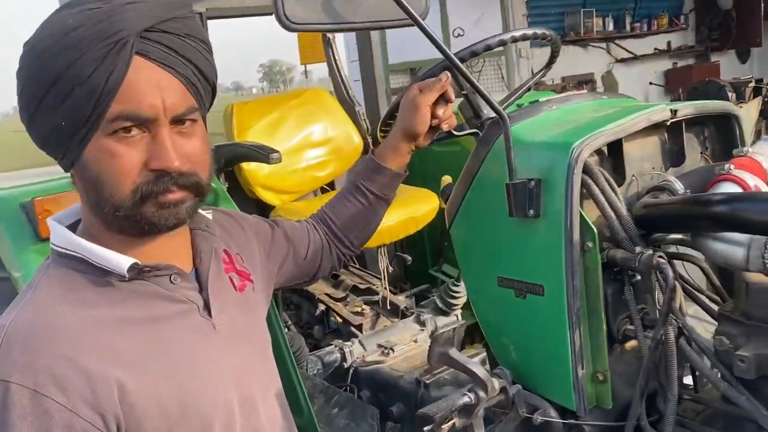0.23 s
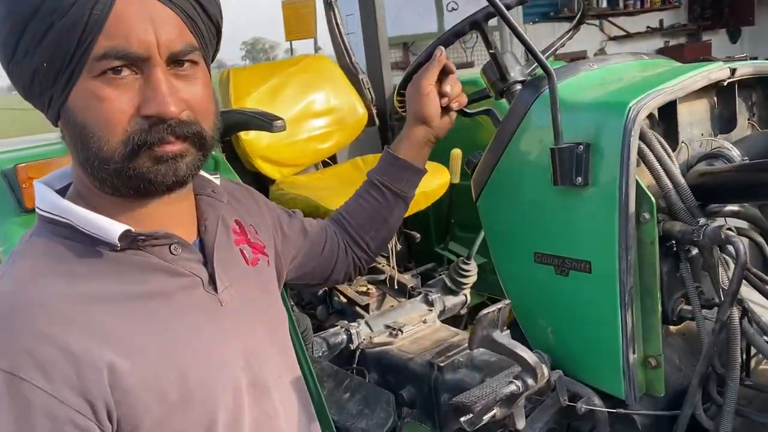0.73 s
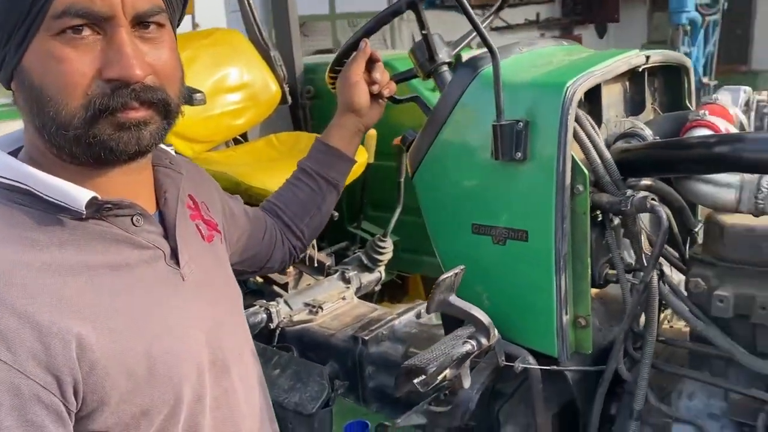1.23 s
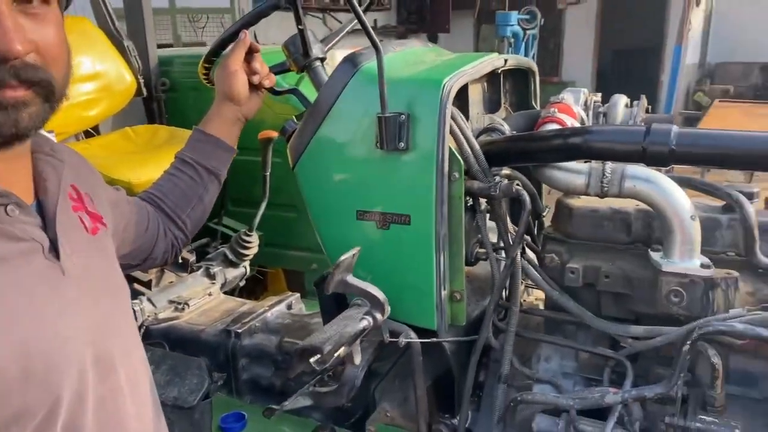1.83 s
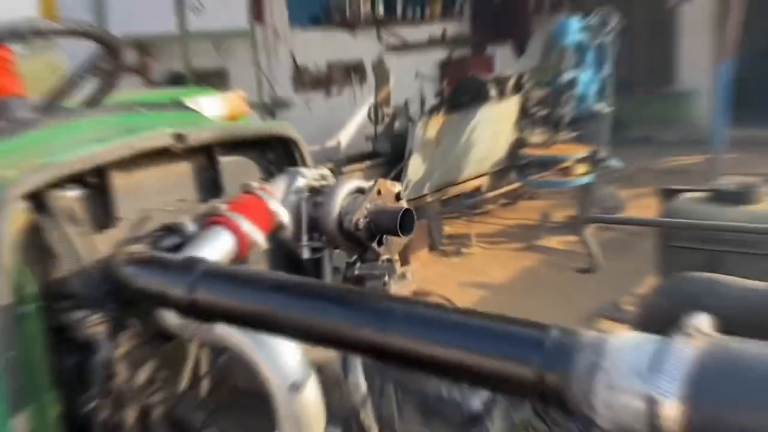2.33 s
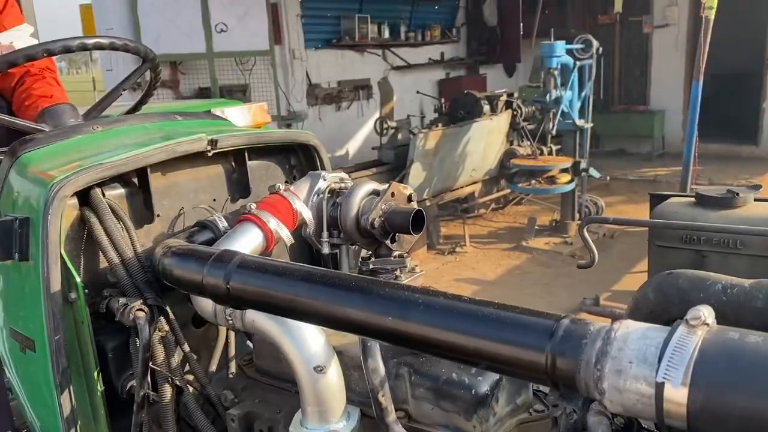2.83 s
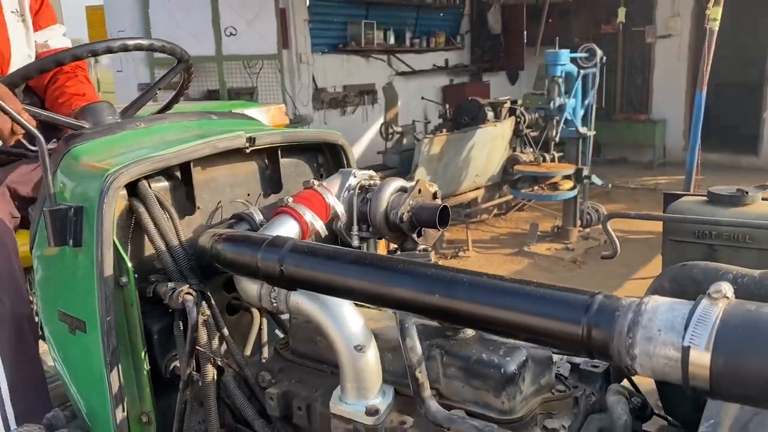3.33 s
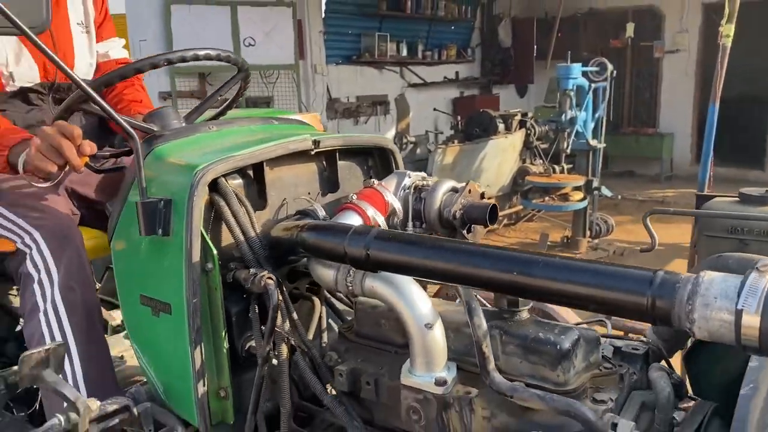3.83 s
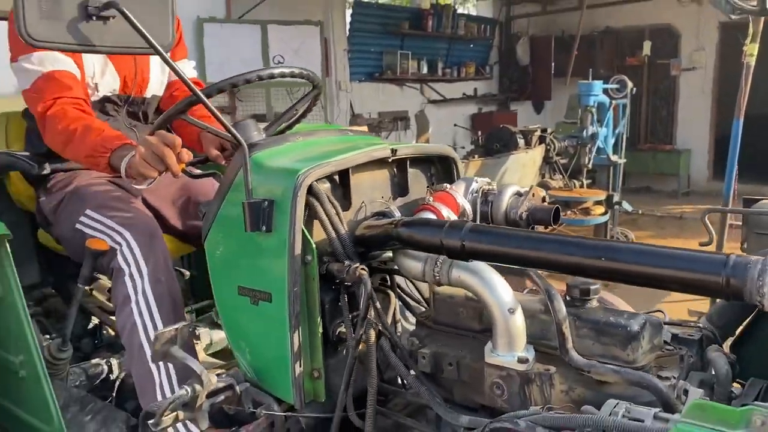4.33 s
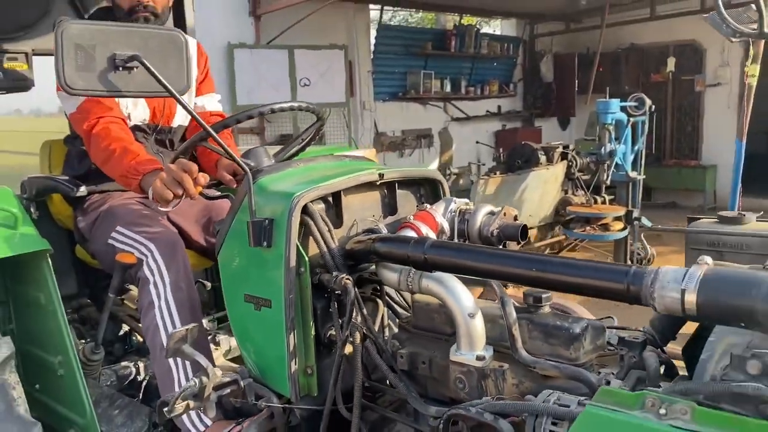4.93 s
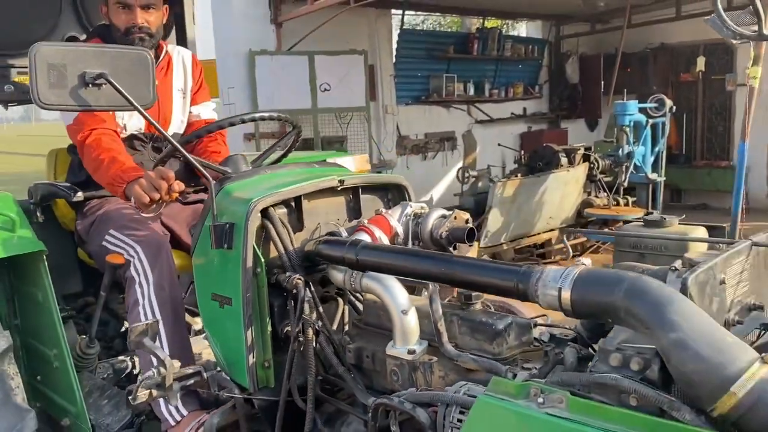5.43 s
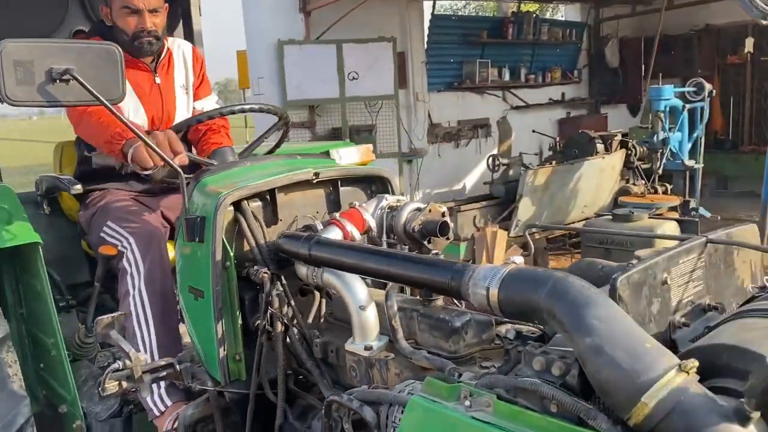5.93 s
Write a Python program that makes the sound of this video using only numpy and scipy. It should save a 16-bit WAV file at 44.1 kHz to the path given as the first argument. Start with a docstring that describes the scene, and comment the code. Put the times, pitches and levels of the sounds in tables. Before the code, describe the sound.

Close up in an open workshop yard, a three-cylinder turbo diesel tractor pulls hard at once with rapid knocking and a rising turbo whistle. The throttle shuts after about half a second and it coasts down, fading out. A second pull fades in, higher and fiercer, then shuts with a fluttering hollow moan, sinks to a slow knocking idle, and is revved again at the very end.

```python
"""A three-cylinder turbo diesel tractor is revved close by in an open workshop yard, in two parts.
Part one pulls hard at once, is shut off after 0.6 s and coasts into a fade-out. Part two fades in pulling,
shuts at 3.3 s, moans as the boost bleeds off, slows to idle and pulls again from 5.7 s.
Each firing knocks the block (shaped noise), spits air and thumps the open pipe (filtered clicks);
the turbine whistles (a gliding sine), lagging behind the throttle."""
import sys
import numpy as np
from scipy import signal
from scipy.io import wavfile
from scipy.ndimage import uniform_filter1d

SR = 44100
rng = np.random.default_rng(int(sys.argv[2]) if len(sys.argv) > 2 else 0)


def unload_audio(sound):
    """Save the sound as a 16-bit wav file, at the path given as the first command line argument."""
    columns = np.transpose(np.atleast_2d(sound))
    # keep every value between -1 and 1, then stretch to whole-number steps
    steps = np.round(np.clip(columns, -1, 1) * 32767)
    wavfile.write(sys.argv[1], SR, steps.astype(np.int16))


N = 272538

# Engine speed, one table a part: (time [s], firing rate [1/s])
FIRING_RATE = [
    [(0.0, 29.75), (0.2, 34.32), (0.4, 39.99), (0.55, 42.85), (0.7, 43.86), (0.9, 42.81), (1.2, 40.57),
     (1.5, 37.29), (1.8, 35.05), (2.2, 31.88)],
    [(2.2, 43.85), (2.45, 49.83), (2.7, 56.57), (2.95, 62.19), (3.15, 56.4), (3.35, 52.57), (3.5, 47.4),
     (3.7, 37.78), (3.9, 28.34), (4.1, 22.66), (4.35, 23.02), (4.6, 19.03), (4.9, 18.78), (5.3, 19.36),
     (5.7, 19.57), (5.8, 22.47), (6.0, 27.14), (6.18, 32.32)],
]
# Share of a firing cycle gone when each part opens: (part one [cycle], part two [cycle])
FIRST_TURN = [.26, .22]
# Throttle, one table a part:
# (time [s], fuel [0-1], hard-working tone in the pipe [0-1], hard-working tone in the block [0-1])
THROTTLE = [
    [(0, 0.96, 0.98, 0.8), (.4, 0.98, 1, 0.7), (.64, 0.55, 0.9, 0.36), (.74, 0.12, 0.03, 0.02),
     (2.2, 0.08, 0.06, 0.01)],
    [(2.2, 1, 0.95, 0.97), (2.8, 0.91, 1, 0.98), (3.0, 0.51, 1, 1), (3.2, 0.95, 1, 0.99),
     (3.33, 0.8, 0.92, 0.68), (3.4, 0.53, 0.4, 0.5), (3.6, 0.08, 0, 0.43), (3.9, 0.02, 0.1, 0.41),
     (4.2, 0.1, 0.2, 0.18), (4.5, 0.05, 0.1, 0.4), (4.8, 0.19, 0, 0.67), (5.735, 0.26, 0, 0.7),
     (5.75, 0.97, 0.95, 0.67), (6.18, 1, 0.97, 0.62)],
]
# Treble, one table a part: (time [s], air spit level [dB], treble level above the whistle [dB])
TREBLE = [
    [(0, -24, 0), (.3, -24.5, 6), (.62, -33.5, -6), (.76, -30, 0), (1.1, -27.5, -27), (1.75, -31.5, -37),
     (2.2, -29.5, 0)],
    [(2.2, -25.5, 5), (2.6, -27, 2), (3.3, -39, 2.5), (3.5, -37, 4), (3.7, -30.5, 2), (3.95, -31, 5),
     (4.15, -36.5, -39), (4.35, -35, -17), (4.5, -39, -2), (4.68, -45, -18), (4.8, -57, -2),
     (4.95, -49, -3.5), (5.72, -65, -0.5), (5.75, -34.5, 0), (6.18, -29.5, -5.5)],
]
IDLE_S, SETTLE_S = 4.5, 0.28  # the idle takes hold in part two


def tractor(part, t):
    """One part of the engine: every layer is paced by the same firing count."""
    idle = np.clip((t - IDLE_S) / SETTLE_S, 0, 1) if part else 1
    rate, = curves(FIRING_RATE[part], t)
    spit_db, treble_db = curves(TREBLE[part], t)
    fuel, pipe_share, block_share = np.clip(curves(THROTTLE[part], t), 0, 1)
    idling = part * idle * np.clip(2 - 2 * fuel, 0, 1)
    blade_hz = turbine(part, t)
    pipe_db, knock_db, clatter_db, hiss_db = levels(part, fuel, rate, blade_hz)

    turns = FIRST_TURN[part] + np.cumsum(rate) / SR
    fired = firing_count(part, turns, fuel, rate)
    firing_db = strengths(part, t, fired)
    other_db = rng.standard_normal(400)

    pipe = exhaust_pipe(part, turns, fired, rate, other_db, pipe_share, idle)
    rough = gain_of(knock_db) * block_knock(part, fired, firing_db, idling)
    rough = rough + gain_of(spit_db) * air_spit(part, fired, firing_db, fuel, blade_hz)
    rough = rough + idling * valve_tick(turns, other_db)
    rough = rough + gain_of(clatter_db) * gear_clatter(part, turns, fuel, block_share, idle)
    rough = rough + gain_of(hiss_db) * air_hiss(part, len(t))
    rough = through_tinware(rough, np.minimum(blade_hz + 350, 13000), treble_db)
    tones = whistle(part, blade_hz, fired, firing_db, fuel) + moan(part, t, turns, rate)
    return gain_of(pipe_db) * pipe + rough + tones


# Knock advance under full fuel: (part one [cycle per firing/s], part two [cycle per firing/s])
ADVANCE = [0, .0135]
SLOW_FIRING = 22  # firings/s; no advance at this speed
COAST_LEAD = .1  # cycles earlier with the fuel cut
IDLE_LAG = .085  # cycles later with the fuel cut, per firing/s under SLOW_FIRING


def firing_count(part, turns, fuel, rate):
    """Combustion timing: advance grows with speed under fuel; slow coasting strokes come late."""
    advance = ADVANCE[part] * fuel * (rate - SLOW_FIRING)
    coast_lead = COAST_LEAD - IDLE_LAG * np.maximum(SLOW_FIRING - rate, 0)
    # a cylinder knocks almost half a cycle ahead of the count
    return turns + 0.4537 + advance + coast_lead * (1 - fuel)


# Firings under fuel, harder or softer than usual, one table a part: (time [s], strength [dB])
FIRING_STRENGTHS = [
    [(.017, -0.5), (.08, -2.5), (.112, -4), (.143, 1.5), (.173, -1), (.203, -2.5), (.23, 1), (.258, 1),
     (.286, -2.5), (.34, 2), (.366, -2), (.391, 2), (.442, -3), (.466, 1), (.489, 2), (.514, -1.5),
     (.537, 4)],
    [(5.76, 1), (5.806, 0), (5.849, 4), (5.889, 1), (6.04, 1), (6.072, 1), (6.105, 2.5), (6.142, 0.5)],
]


def strengths(part, t, fired):
    """dB of each firing: by chance, or from the table of firing strengths."""
    s, db = np.transpose(FIRING_STRENGTHS[part])
    firing_db = 1.8 * rng.standard_normal(400)
    firing_db[np.floor(np.interp(s, t, fired)).astype(int)] = db
    return firing_db


# Exhaust pipe resonance, a pulling and a coasting table for each part: (frequency [Hz], level [dB])
PIPE = [
    [[(24, -69), (40, -20), (59, 5), (105, 9.5), (150, 9.5), (200, -2.5), (277, 11.5), (367, -7.5),
     (450, -15), (580, -14), (990, -120)], [(24, -75), (40, -45), (50, -10), (64, -5), (133, -7.5),
     (162, 1), (248, -10), (450, -35), (580, -30), (990, -120)]],
    [[(24, 11), (40, -38), (58, -4.5), (115, 4), (172, -4.5), (238, -9), (450, -9), (580, -41),
     (990, -120)], [(24, -9), (40, -3), (73, 4), (181, -6), (245, -13), (450, -35), (580, -32),
     (990, -120)]],
]
# Thinner pipe tone as part two slows with the fuel cut: (frequency [Hz], level [dB])
SLOWING_PIPE = [(24, -39), (45, -8), (70, 2), (95, 0), (140, 3.5), (180, 3), (230, -12.5), (450, -23),
                (580, -40), (990, -120)]
PIPE_RUN_S = 0.00746  # a fuelled puff runs down the pipe
PIPE_ECHO_S, PIPE_ECHO = 0.0193, -0.52  # at idle each puff returns inverted from the open end


def exhaust_pipe(part, turns, fired, rate, other_db, share, idle):
    """Each firing's gas puff, a click over flow noise, excites the resonances of the open pipe."""
    per_puff = np.sqrt(40 / rate)
    pulling = evened(beats(fired - PIPE_RUN_S * rate, other_db)) * per_puff + 0.093 * noise(len(turns))
    if part:
        puffs = evened(beats(turns + .2 + .005 * rate, 2.5 * other_db)) * per_puff
        puffs = puffs + (.13 + .12 * idle) * noise(len(turns))
        puffs = puffs + PIPE_ECHO * idle * np.roll(puffs, round(PIPE_ECHO_S * SR))
    else:
        puffs = evened(beats(turns + 0.719 - 0.01214 * rate, 1.1 * other_db)) * per_puff
        puffs = dispersed(puffs + 0.15 * noise(len(turns)), 91, 41)
    return blended(pulling, puffs, PIPE[part], SLOWING_PIPE, share, idle)


def dispersed(x, hz, width_hz):
    """All-pass: a long pipe lets the tones around hz arrive late, spreading each puff."""
    r = np.exp(-np.pi * width_hz / SR)
    poles = np.array([1, -2 * r * np.cos(2 * np.pi * hz / SR), r ** 2])
    return signal.lfilter(poles[::-1], poles, x)


# Knock spectrum, one table a part: (frequency [Hz], level [dB])
KNOCK = [
    [(300, -31.5), (600, 8.5), (1100, -5.5), (1900, -7), (2600, 0), (4200, -0.5), (6300, -5), (9000, -36)],
    [(300, -27), (600, 8.5), (1100, -4), (2000, -1.5), (3300, -2.5), (5400, -3), (7000, -11), (9000, -26)],
]
# Knock rise time: (part one [s], part two [s])
KNOCK_RISE_S = [0.0034, 0.0039]
KNOCK_LAG, IDLE_KNOCK_LAG = [.04, 0], .19  # cycles the knock trails the spit: each part; more at idle


def block_knock(part, fired, firing_db, idling):
    """Combustion hits the block: a short noise burst with a weaker second hump."""
    knocks = beats(fired - KNOCK_LAG[part] - IDLE_KNOCK_LAG * idling, firing_db)
    envelope = burst(knocks, KNOCK_RISE_S[part], 0.0038, 0.0087, -16.5)
    return envelope * coloured(noise(len(fired)), KNOCK[part])


# Air noise spectrum, one table a part: (frequency [Hz], level [dB])
AIR = [
    [(6000, -8.5), (7300, 0.5), (8400, 2), (10800, 3.5), (12500, -1.5), (15800, -32)],
    [(6000, -7), (7000, -2), (9000, -0.5), (10800, 5.5), (12500, 4), (14000, -10), (15800, -13.5)],
]
JET_SHARE, JET_TOP_HZ = .76, 11800  # jet centre as a share of blade pitch, and its ceiling
JET_DRIFT_HZ = [1640, 1400]  # cutoff of the jet's random drift in each part


def air_spit(part, fired, firing_db, fuel, blade_hz):
    """Air bursts: broad noise under fuel; coasting, a narrow jet that sinks with the turbine."""
    n = len(fuel)
    broad = coloured(noise(n), AIR[part])
    carrier = np.exp(2j * np.pi * np.cumsum(np.minimum(JET_SHARE * blade_hz, JET_TOP_HZ)) / SR)
    jet = (wander(n, JET_DRIFT_HZ[part]) + 1j * wander(n, JET_DRIFT_HZ[part])) * carrier
    air = np.sqrt(fuel) * broad + np.sqrt(1 - fuel) * jet.real
    return burst(beats(fired, firing_db), 0.0025, 0.0042, 0.0098, -23.5) * air


# Each pull on the throttle, one table a part:
# (open [s], shut [s], blade pitch at opening [Hz], climb [Hz/s])
REVS = [
    [(0, .595, 8760, 10950)],
    [(2.2, 3.35, 17000, 5235), (5.745, 6.2, 6960, 8700)],
]
# Blade pitch sinking once shut, one row a part: (target [Hz], lag [s])
COAST = [(9287, 1.25), (5787, .89)]


def turbine(part, t):
    """Blade pitch climbs steadily under throttle and sinks with a lag once it shuts."""
    rest_hz, lag_s = COAST[part]
    hz = np.zeros(len(t))
    for opens, shuts, from_hz, climb in REVS[part]:
        risen_hz = from_hz + climb * (np.minimum(t, shuts) - opens)
        sinking = np.exp(-np.maximum(t - shuts, 0) / lag_s)
        hz = np.where(t >= opens, rest_hz + (risen_hz - rest_hz) * sinking, hz)
    return uniform_filter1d(hz, size=1500, mode="nearest")


# Whistle loudness by pitch, one table a part: (blade pitch [Hz], coasting [dB], pulling [dB])
INTAKE = [
    [(8780, -39, -27.5), (10500, -37, -15.5), (10420, -38, -16.5), (11800, -19, -31.5), (11570, -19.5, -19),
     (12670, -31.5, -21), (12700, -37, -25), (13500, -39, -27), (14400, -41, -28), (15300, -48, -32)],
    [(6970, -45, -25), (7540, -64, -27.5), (8000, -43.5, -32), (8200, -52, -32.5), (9500, -26.5, -29),
     (10230, -37, -26), (10900, -32, -25), (11900, -31, -21), (12700, -35, -30), (14100, -44, -40),
     (15700, -37, -50)],
]
# Coasting whistle left between pulses: (part one [ratio], part two [ratio])
WHISTLE_FLOOR = [0.26, 0.064]
# Sharpness of the coasting pulses: (part one [exponent], part two [exponent])
WHISTLE_CHOP = [1, 2.2]
# Coasting pitch fall within a pulse, negative rises: (part one [Hz], part two [Hz])
WHISTLE_SAG_HZ = [90, -90]


def whistle(part, hz, fired, firing_db, fuel):
    """A blade tone kicked by each exhaust pulse; under fuel it jumps up in pitch, then sags."""
    n, since = len(hz), fired % 1
    coast_db, pull_db = curves(INTAKE[part], hz)
    db = coast_db * (1 - fuel) + pull_db * fuel + 0.49 * fuel * firing_db[fired.astype(int)]
    kicked = np.exp(-since / 0.5) * np.sin(np.pi / 2 * np.minimum(since / 0.013, 1)) ** 2
    coasting = np.sin(np.pi * ((since - .08) % 1)) ** WHISTLE_CHOP[part] + WHISTLE_FLOOR[part]
    swell = uniform_filter1d(evened(kicked) * fuel + evened(coasting) * (1 - fuel), size=60)
    swell = swell * gain_of((5.0 + 4.5 * fuel) * np.tanh(wander(n, 118)))
    sag_hz = WHISTLE_SAG_HZ[part] * (1 - fuel) + 310 * fuel
    bent_hz = hz + sag_hz * uniform_filter1d(.5 - since, size=130)
    bent_hz = bent_hz + (25 + 60 * fuel) * wander(n, 350)
    return gain_of(db) * evened(swell) * np.sqrt(2) * np.sin(2 * np.pi * np.cumsum(bent_hz) / SR)


# Boost whirling in the intake: (time [s], pitch [Hz], level [dB])
MOAN = [(.25, 1363, -37), (.64, 1433, -29.5), (.72, 1252, -44), (2.5, 1530, -79), (2.85, 1456, -35.5),
        (3.32, 1476, -27.5), (3.345, 1432, -22), (3.44, 1343, -25), (3.6, 1057, -29), (3.9, 926, -31.5),
        (4.1, 832, -38), (4.25, 830, -54)]
MOAN_SHUT_S = 3.335  # the throttle shuts on the boost: gulps before, chirps after
# Place of the gulp in the firing cycle: (part one [cycle], part two [cycle])
GULP_PHASE = [.9, .24]
CHIRP_PHASE, CHIRP_LEAD_S = .78, .018  # place in the cycle at 38 firings/s; lead above that speed
CHIRP_S, REBOUND_S, REBOUND_DB = .0025, .014, -2.5  # half length; rebound, at most half a cycle late


def moan(part, t, turns, rate):
    """A rough intake tone: one gulp a firing, then a short chirp and its weaker rebound."""
    hz, db = curves(MOAN, t)
    gulping = t < MOAN_SHUT_S
    gulp = evened((1 + np.cos(2 * np.pi * (turns - GULP_PHASE[part]))) ** 9)
    cycle = turns - CHIRP_PHASE + CHIRP_LEAD_S * (rate - 38)
    chirp = np.exp(-.5 * (((cycle + .5) % 1 - .5) / rate / CHIRP_S) ** 2)
    rebound = np.interp(t - np.minimum(REBOUND_S, .5 / rate), t, chirp)
    chop = np.where(gulping, gulp, evened(chirp + gain_of(REBOUND_DB) * rebound))
    bent_hz = hz * (1 + 0.1 * ~gulping * np.cos(2 * np.pi * (cycle - .12)))
    fuzz = wander(len(t), 60) + 1j * wander(len(t), 60) + 2.6
    tone = evened((fuzz * np.exp(2j * np.pi * np.cumsum(bent_hz) / SR)).real)
    return (t < MOAN[-1][0]) * gain_of(db) * chop * tone


# Valve tick spectrum: (frequency [Hz], level [dB])
VALVE = [(300, -17), (590, 0), (700, -6), (1000, -20), (3200, 6), (5500, -11), (8000, -28)]
VALVE_PHASE, VALVE_DB = 0.51, -48  # place in the cycle; level at full idle


def valve_tick(turns, other_db):
    """A valve ticks between the idle knocks: short noise bursts."""
    ticks = beats(turns - VALVE_PHASE + 1, 3.0 * other_db[::-1])
    envelope = burst(ticks, .003, 0.0061, 0.0087, -13)
    return gain_of(VALVE_DB) * envelope * coloured(noise(len(turns)), VALVE)


# Block and tinware, a pulling and a coasting table for each part: (frequency [Hz], level [dB])
BLOCK = [
    [[(88, -15), (150, -18), (278, -5.5), (505, -9), (671, -9.5), (1020, -9.5), (1350, -11), (8000, -24.5),
     (10400, -42), (17600, -120)], [(88, -22), (150, -5), (538, -13), (665, -4), (796, -8), (4670, -12.5),
     (5870, -22), (7500, -22), (9750, -72), (16500, -120)]],
    [[(88, -42), (150, -4), (705, -4), (983, -5), (1790, -3), (4250, -12), (5460, -6.5), (6440, -21.5),
     (8000, -13.5), (10400, -28), (17600, -120)], [(120, -39), (200, 9.5), (215, -19), (334, 0.5),
     (510, -4), (599, 6), (1140, -10.5), (6600, -13), (8580, -39), (14500, -120)]],
]
# Thinner block tone as part two slows with the fuel cut: (frequency [Hz], level [dB])
SLOWING_BLOCK = [(120, -40), (200, -29), (280, -35), (400, -19), (600, -2.5), (1140, -10), (4800, -9.5),
                 (6600, -16.5), (8580, -32), (14500, -120)]


def gear_clatter(part, turns, fuel, share, idle):
    """Gears and tappets rattle unevenly and breathe a little with the firings."""
    n = len(turns)
    breath_db = (-0.07 + 1.4 * fuel) * np.cos(2 * np.pi * (turns + 0.74))
    rattle = gain_of(1.17 * wander(n, 290) + breath_db)
    return evened(rattle) * blended(noise(n), noise(n), BLOCK[part], SLOWING_BLOCK, share, idle)


def air_hiss(part, n):
    """Steady air noise with a random flutter in level."""
    return coloured(noise(n), AIR[part]) * gain_of(1.43 * wander(n, 160))


# Ringing of covers and pipes: (frequency [Hz], width [Hz], lift [dB])
TINWARE = [(660, 60, 0), (2330, 42, 2), (3170, 160, 1), (4260, 79, -0.5), (4800, 59, 2.5), (8580, 210, 4.5),
           (9240, 93, 7)]


def through_tinware(x, edge_hz, db):
    """Sheet metal lifts its own bands; the treble above a moving edge is raised or cut by db."""
    f, t, z = signal.stft(x, SR, nperseg=512, noverlap=384)
    at = np.minimum((t * SR).astype(int), len(x) - 1)
    lift_db = sum(lift / (1 + (2 * (f - hz) / width) ** 2) for hz, width, lift in TINWARE)
    over = np.clip((f[:, None] - edge_hz[at]) / 300, 0, 1)
    # the noise level wavers at random in narrow, slowly drifting patches
    patches = uniform_filter1d(rng.standard_normal(z.T.shape), size=30, axis=0)
    patches = uniform_filter1d(patches, size=2, axis=1).T
    z = z * gain_of(over * db[at] + lift_db[:, None] + 1.47 * evened(patches))
    return signal.istft(z, SR, nperseg=512, noverlap=384)[1][:len(x)]


# Rows pipe, knock, clatter, air hiss: (coasting in part one [dB], coasting in part two [dB],
# added by full fuel [dB], by engine speed [dB/octave], by turbine speed [dB/octave])
LAYERS = [(-38, -38.5, 15, 12.5, -0.8), (-43.5, -47.5, 20.5, 0.5, -0.3), (-30.5, -31.5, 4, 8.5, 3.5),
          (-32.5, -35, -0.5, 3.5, 12)]
USUAL_FIRING, USUAL_BLADE_HZ = 40, 12000  # speeds (firings/s, Hz) at which the coasting levels hold


def levels(part, fuel, rate, blade_hz):
    """Each layer's dB follows fuel, engine speed and turbine speed."""
    engine, turbo = np.log2(rate / USUAL_FIRING), np.log2(blade_hz / USUAL_BLADE_HZ)
    return [row[part] + row[2] * fuel + row[3] * engine + row[4] * turbo for row in LAYERS]


def blended(hard, easy, pair, slowing, share, idle):
    """Mixes the pulling tone with the coasting one, itself mixed from slowing and idle tones."""
    coasting = np.sqrt(idle) * coloured(easy, pair[1]) + np.sqrt(1 - idle) * coloured(easy, slowing)
    return np.sqrt(share) * coloured(hard, pair[0]) + np.sqrt(1 - share) * coasting


def beats(turns, strength_db):
    """One click per whole turn, sized by the strength of that firing."""
    whole = np.floor(turns).astype(int)
    return np.diff(whole, prepend=whole[0]) * gain_of(strength_db[whole])


def burst(clicks, rise_s, fall_s, echo_s, echo_db):
    """Envelope of a burst after each click, with a weaker second hump; rms 1."""
    t = np.arange(3000) / SR
    shape = (1 - np.exp(-(t / rise_s) ** 2)) * np.exp(-t / fall_s)
    shape = shape + gain_of(echo_db) * np.interp(t - echo_s, t, shape, left=0)
    return evened(signal.oaconvolve(clicks, shape)[:len(clicks)])


def coloured(x, points):
    """Filters through a spectrum with causal (minimum) phase; rms 1."""
    f, db = np.transpose(points)
    bins_hz = np.fft.rfftfreq(16384, 1 / SR)
    half_db = np.interp(np.log(bins_hz + 1), np.log(f + 1), np.maximum(db, -70))
    log_gain = np.r_[half_db, half_db[-2:0:-1]] * np.log(10) / 20
    taps = np.fft.ifft(np.exp(np.conj(signal.hilbert(log_gain)))).real[:8192]
    return evened(signal.oaconvolve(x, taps)[:len(x)])


def noise(n):
    """White noise."""
    return rng.standard_normal(n)


def wander(n, hz):
    """Random drift: noise low-passed at hz, rms 1."""
    return evened(signal.sosfiltfilt(signal.butter(2, hz, fs=SR, output="sos"), noise(n)))


def curves(rows, t):
    """Columns of a table read at the points t of its first column."""
    s, *columns = np.transpose(rows)
    return [np.interp(t, s, c) for c in columns]


def gain_of(db):
    """Decibels to amplitude."""
    return 10 ** (np.asarray(db) / 20)


def evened(x):
    """Scales to rms 1."""
    return x / np.sqrt(np.mean(x ** 2) + 1e-20)


JOIN_S, FADE_S = 2.203, .42  # each fade lasts FADE_S


def scene():
    """The first part fades out and the second fades in."""
    t = np.arange(N) / SR
    parts = [tractor(0, t[t < JOIN_S]), tractor(1, t[t >= JOIN_S])]
    fade = np.minimum(abs(t - JOIN_S) / FADE_S, 1)
    return (np.concatenate(parts) * fade)[None]


EDGE_HZ = 15830  # upper band limit


def record(dry):
    """The microphone drops the deepest bass; then the band limit."""
    thin = signal.sosfilt(signal.butter(3, 48, "high", fs=SR, output="sos"), dry)
    band = signal.firwin(2047, EDGE_HZ, window=("kaiser", 12), fs=SR)
    return signal.oaconvolve(thin, band[None], "same")


dry = scene()
out = record(dry)
unload_audio(out)
```